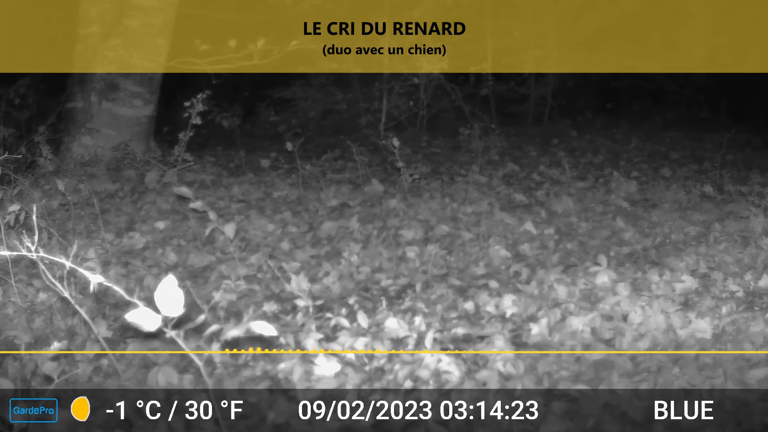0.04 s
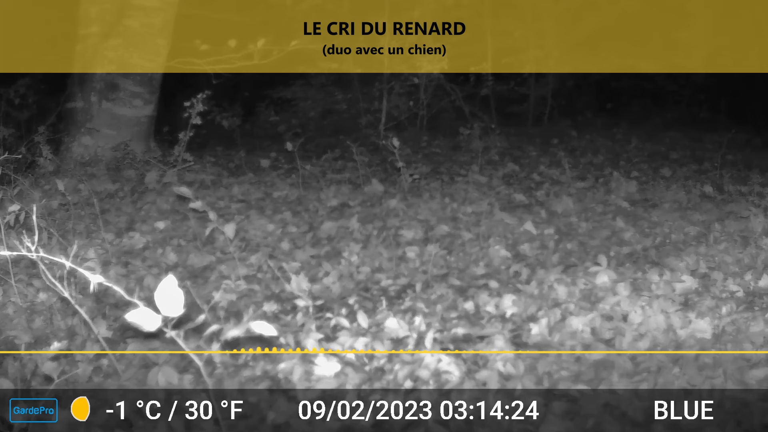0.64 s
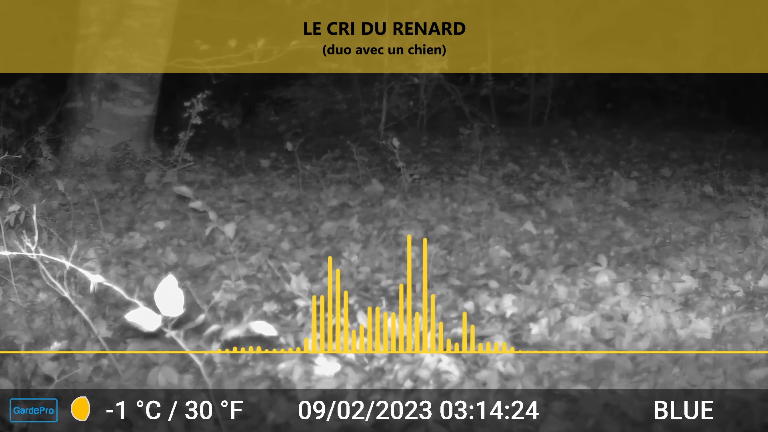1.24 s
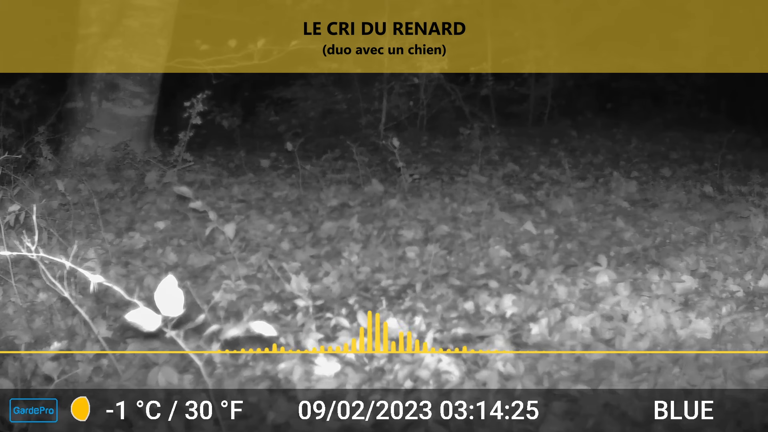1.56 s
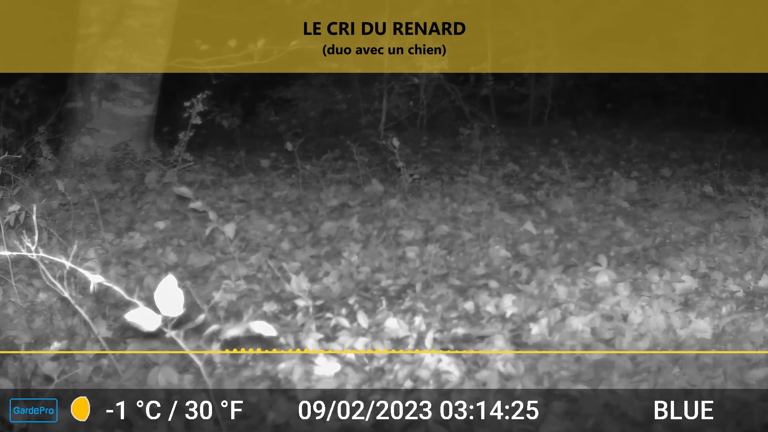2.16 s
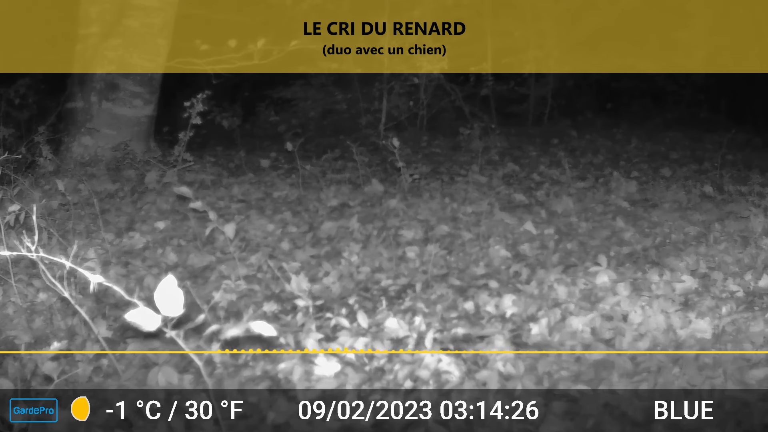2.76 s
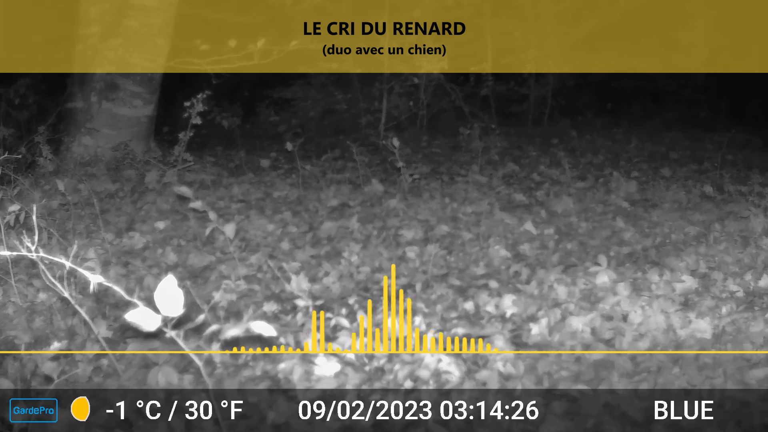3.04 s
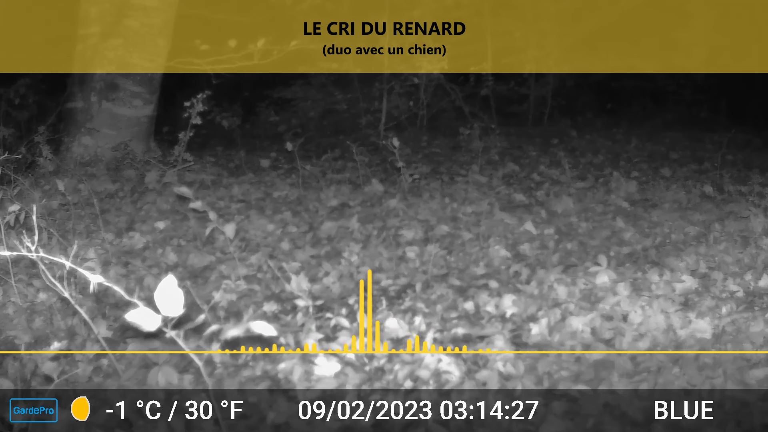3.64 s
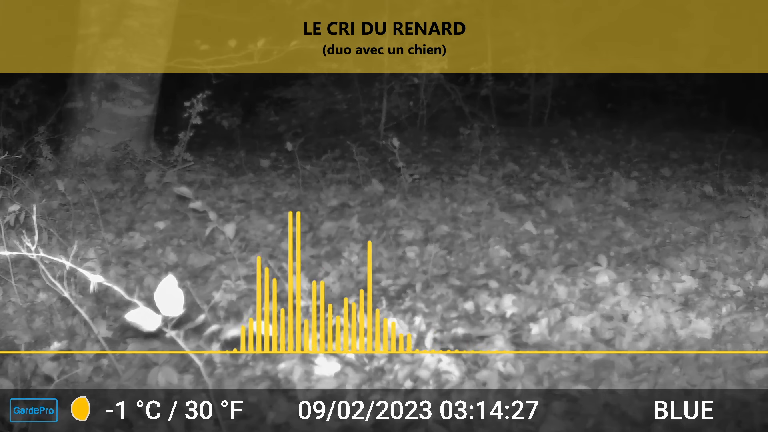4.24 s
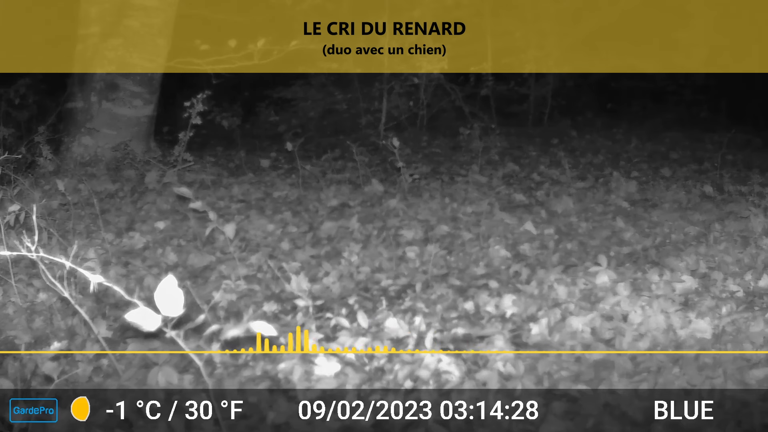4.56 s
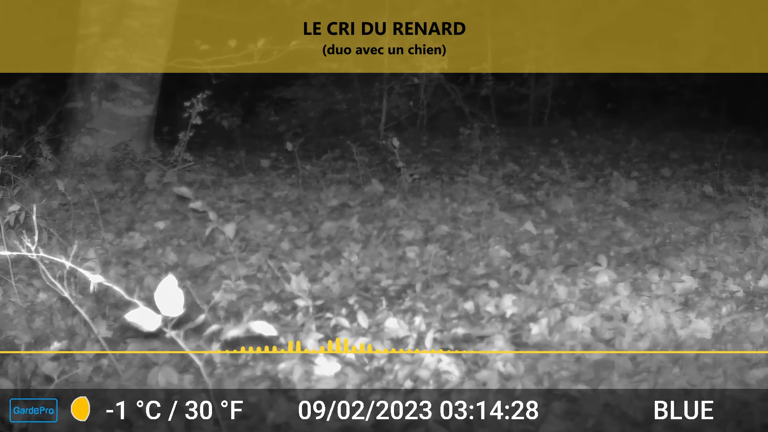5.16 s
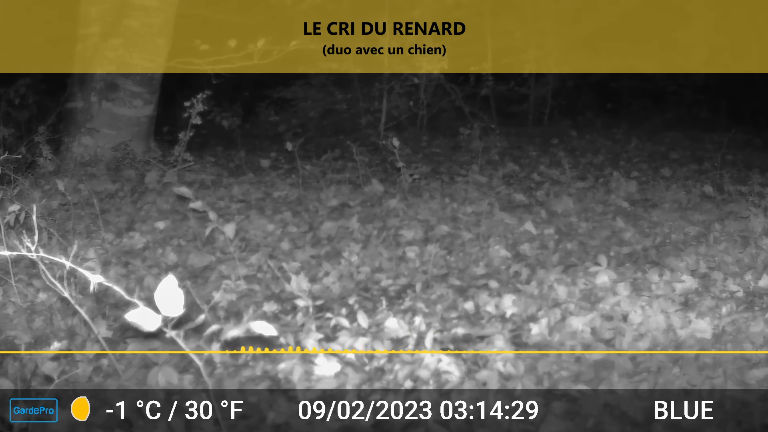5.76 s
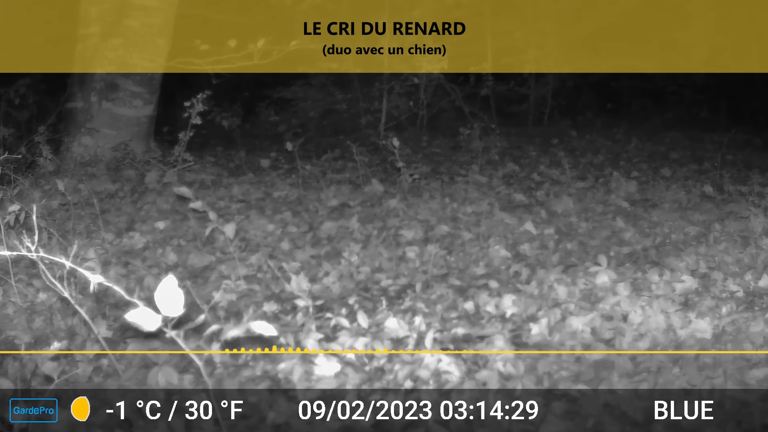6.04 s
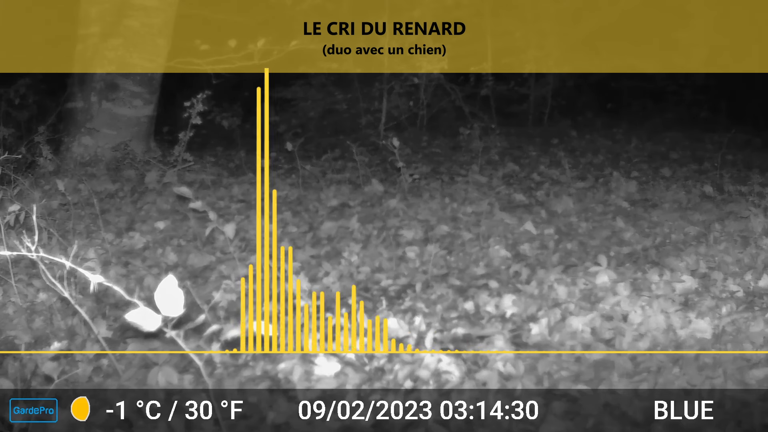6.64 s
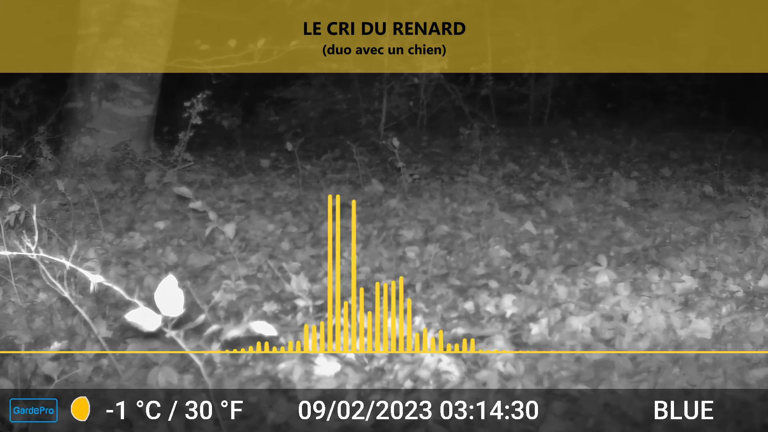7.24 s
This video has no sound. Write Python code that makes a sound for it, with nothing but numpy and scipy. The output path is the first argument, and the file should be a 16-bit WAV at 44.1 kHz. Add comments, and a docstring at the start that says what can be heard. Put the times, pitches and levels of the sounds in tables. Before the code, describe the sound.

A fox screams four times in a quiet wood at night while a dog barks twice further off, over faint steady hiss.

```python
"""A still wood at night, heard through the one microphone of a small trail camera.
A fox screams four times: its vocal folds start in a thin whistle, break into period doubling,
tripling and rasp, and mostly fall back to the whistle. Further off a dog barks twice, rough pulses
ringing its chest and mouth. Trunks scatter the calls into a long tail; underneath lie the
microphone's hiss and a low, bumping rumble."""
import sys
import numpy as np
from scipy import signal
from scipy.fft import rfft, irfft, next_fast_len
from scipy.io import wavfile
from scipy.ndimage import uniform_filter1d, map_coordinates

SR = 44100
rng = np.random.default_rng(int(sys.argv[2]) if len(sys.argv) > 2 else 0)


def pcm_store(signal):
    """Save signal as 16-bit PCM."""
    levels = np.round(np.clip(np.atleast_2d(signal), -1, 1) * 32767)
    wavfile.write(sys.argv[1], SR, levels.astype(np.int16).T)


N = 330309
T = np.arange(N) / SR
SLIP_S = 0.058  # time the folds take to slip into a way of vibrating


def fox():
    """Four screams and a few yelps, answered by near trunks and the depth of the wood."""
    # One arch per call. Each row: time in seconds, fold pitch in Hz, effort in dB, rasp in dB,
    # upper edge set by the mouth's opening in Hz.
    arches = [
        [(.88, 794.3, -63.5, -25, 1500), (.92, 779.7, -52, -30.5, 1510), (.957, 791, -61, -24.5, 1510),
         (.975, 807, -43, -27.5, 1510), (1.002, 824.6, -37, -29, 1810), (1.012, 820.8, -43, -15, 2050),
         (1.058, 824.6, -38.5, -18.5, 2040), (1.076, 880.3, -33, -11, 2200), (1.11, 906.5, -32.5, -7, 2420),
         (1.145, 924.5, -31, -6, 2670), (1.175, 941.2, -28, -9, 2760), (1.235, 954, -28.5, -7, 2740),
         (1.29, 948, -29, -2.5, 2840), (1.38, 957, -28, -1.5, 3000), (1.54, 893.2, -29.5, -3.5, 2670),
         (1.578, 869.6, -28.5, -6, 2330), (1.592, 856, -41.5, -15, 2400), (1.70, 789, -39, -14, 1900)],
        [(2.995, 792, -61, -28.5, 1490), (3.012, 825.7, -39.5, -23.5, 1515), (3.04, 809, -48, -25.5, 1790),
         (3.06, 813.2, -41, -24, 1906), (3.095, 854.2, -35, -20, 2250), (3.13, 935.3, -33, -3, 2520),
         (3.185, 886.8, -29.5, -7, 2730), (3.27, 907, -28, -6, 2780), (3.31, 902.6, -28.5, -1.5, 2750),
         (3.36, 887.5, -28, -6.5, 2670), (3.43, 865, -28.5, -6.5, 2540), (3.48, 882.4, -30, -8, 2660),
         (3.53, 901, -28, -10.5, 2600), (3.61, 883.3, -32, -14.5, 2540), (3.68, 844.5, -37, -16.5, 2350),
         (3.76, 801, -36, -16.5, 2110), (3.84, 734, -46, -9.5, 1580)],
        [(4.7, 771, -50, -40, 1490), (4.76, 788, -35.5, -34, 1470), (4.83, 806, -34.5, -29, 1810),
         (4.89, 819.3, -34, -32.5, 1946), (4.96, 826.5, -35, -29, 2210), (5.06, 795, -38, -22, 2096),
         (5.15, 773.5, -40.5, -12, 1830), (5.185, 745, -59.5, -24, 1600), (5.26, 670, -51, -15.5, 1500)],
        [(7.17, 798, -42, -24, 1300), (7.203, 882, -35, 4, 2210), (7.245, 909, -28.5, 0.5, 2400),
         (7.258, 1014, -25.5, -5, 2400), (7.32, 1050, -28, 0.5, 2450), (7.38, 1056, -29, 6, 2500),
         (7.49, 1013, -32, 2, 2450)],
    ]
    # One row per call: voice breaks and whistle returns in seconds, plain tone in dB,
    # its fade in dB per second, offset of its overtones in dB, hoarse air in dB.
    courses = [(1.078, 1.49, -5, 31.5, 5.5, -37), (3.101, 3.42, -10, 29.5, 4.5, -31),
               (4.85, 4.846, -33, 9, 2, -50), (7.188, 8.4, 7, 70, -5, -42)]
    # The throat's resonances in each call. Each row: frequency in Hz, gain in dB.
    first_throat = [(500, -46.5), (770, -17), (890, -2.5), (1130, 8), (1420, 1), (1870, 8), (2120, -2.5),
                    (2380, 0.5), (2800, -10), (3300, -16), (3750, -9), (4270, -4), (4700, -14), (5500, -46)]
    second_throat = [(500, -46), (760, -9.5), (890, -4), (1150, -2), (1420, 6), (1800, 6), (2080, 3.5),
                     (2380, 0.5), (2750, -7.5), (3250, -2.5), (3650, -3), (4300, -11.5), (5500, -34)]
    whine_throat = [(600, -56), (1100, -23), (1650, -7), (1920, -5), (2200, -8), (2430, -17), (3200, -28)]
    low_throat = [(400, -58.5), (700, -29), (850, -3), (1050, 4.5), (1300, 1.5), (1700, 4), (2050, -5),
                  (2400, -12), (2750, -9), (3600, -3.5), (4300, -7), (5500, -48.5)]
    # Yelps as calls run out. Each row: centre and half length in seconds, pitch in Hz, level in dB.
    yelps = [(1.618, 0.0028, 1466, -23), (1.705, 0.0093, 1112, -35), (3.866, 0.0089, 1071, -41),
             (5.297, 0.017, 1011, -39.5)]
    throats = [first_throat, second_throat, whine_throat, low_throat]
    direct = sum(scream(*call) for call in zip(arches, courses, throats))
    direct += sum(yelp(*row) for row in yelps)
    near = amp(-11) * scatter(direct, t60=.14, build_s=.004)
    deep = amp(-12.5) * scatter(direct, t60=1.3, build_s=.023)
    return amp(-2.5) * direct + near + deep


def scream(arch, course, throat, whistle_fade_s=.24):
    """The folds whistle, then break into harsher ways of vibrating, coloured by throat and mouth."""
    # Spells when the folds repeat only every second or every third cycle.
    # Each row: start and length in seconds, level in dB.
    doublings = [(1.155, 0.12, 0), (1.26, 0.15, -2.5), (1.495, 0.067, -4), (3.165, 0.125, -1)]
    triplings = [(1.02, 0.1, -6.5), (1.33, 0.21, -6), (3.095, 0.035, -5.5), (3.325, 0.3, -1),
                 (3.62, 0.1, -7.5), (4.855, 0.075, -7.5), (4.935, 0.15, -7), (7.36, 0.18, 1.5)]
    # The mouth's main resonance and its upper edge. Each row: Hz at a mouth_scale of 1, gain in dB.
    mouth_resonance = [(1150, 0.5), (1380, 2), (1540, 4), (1660, 3), (1800, 2.5), (1950, -0.5), (2300, 0.5)]
    mouth_edge = [(1900, 1), (2450, 2), (2600, -5.5), (2780, -15.5), (3050, -25)]
    # Air forced past the folds, a hoarse band above the voice. Each row: frequency in Hz, gain in dB.
    air_band = [(2000, -21), (2900, 0), (3300, -1.5), (3800, -7.5), (4350, -8), (4800, -19.5),
                (6000, -43.5)]
    breaks, returns, tone_db, fade_db_per_s, overtone_db, air_db = course
    inside, t, gate = span(arch[0][0], arch[-1][0])
    hz, effort_db, rasp_db, edge_hz = curves(arch, t)
    slack_db = effort_db - effort_db.max()
    rasp_gain = amp(rasp_db)
    mouth_scale = edge_hz / 2500
    # the whistle sinks while the voice is broken
    broken = np.clip(np.minimum(t - breaks + SLIP_S, returns + SLIP_S - t) / whistle_fade_s, 0, 1)
    whistle_db = -2.5 - 21 * broken + 1.5 * walk(t, 40)
    unrest = .003 + .011 * rasp_gain  # the harsher the voice, the less steady its cycles
    phase = 2 * np.pi * np.cumsum(hz * (1 + .005 * walk(t, 44.93) + unrest * walk(t, 500))) / SR
    # the plain tone comes in towards the break, nearly a sine until the folds are driven hard
    onset_db = -13.5 * np.clip((breaks - t) / .091, 0, 1) ** 2
    plain_db = tone_db + onset_db - fade_db_per_s * np.maximum(t - breaks, 0)
    drive = amp(-9.5 + overtone_db + 3.9 * slack_db)
    plain = stack(t, phase, [1], wander_rad=.6 * rasp_gain) + drive * stack(t, phase, [2, 3])
    halves, thirds = subharmonics(t, phase, rasp_gain, slack_db)
    # the whistle keeps five cycles to every three of the folds, and frays as the rasp grows
    whistle = np.cos(phase * 5 / 3 + 1.2 * np.sqrt(rasp_gain) * walk(t, 150))
    chaos = rasp(t, phase / 2, flutter_db=-.5, flutter_rate=90)
    chaos = sliding_colour(chaos, mouth_resonance, mouth_scale)
    ways = [(plain, amp(plain_db)), (halves, spells(doublings, t)),
            (thirds, spells(triplings, t)), (chaos, rasp_gain)]
    body = sum(gain * unit(colour(way, throat)) for way, gain in ways)
    body = sliding_colour(body, mouth_edge, mouth_scale)
    voice = steady(amp(whistle_db) * unit(whistle) + body)
    air = amp(air_db) * unit(colour(rasp(t, phase, flutter_db=3, flutter_rate=77), air_band))
    air_rise = np.clip((t - breaks) / .33, 0, 1)
    stutter_db = 2.2 * np.clip((t - returns) / whistle_fade_s, 0, 1) * walk(t, 70)
    shimmer_db = .86 * walk(t, 35)
    out = np.zeros(N)
    out[inside] = (voice + air_rise * air) * gate * amp(effort_db + stutter_db + shimmer_db)
    return out


def subharmonics(t, phase, rasp_gain, slack_db):
    """Folds repeating every second or third cycle give partials on a half or a third of the pitch."""
    def partials(period, multiples):
        return stack(t, phase / period, multiples, flicker_db=3.5 * rasp_gain ** .2,
                     flicker_rate=30, wander_rad=rasp_gain)

    halves = amp(-3.5) * partials(2, [3]) + partials(2, range(4, 12))
    thirds = amp(2 + .18 * slack_db) * partials(3, [3, 4]) + partials(3, range(6, 17))
    return halves, thirds


def spells(rows, t):
    """Gain of a way of vibrating that ramps in and out."""
    return sum(amp(db) * np.clip(.5 + np.minimum(t - start, start + length - t) / SLIP_S, 0, 1)
               for start, length, db in rows)


def rasp(t, phase, flutter_db, flutter_rate):
    """Chaotic vibration: a burst of noise each cycle, in uneven flurries."""
    return rng.standard_normal(len(t)) * (1 + np.cos(phase)) * amp(flutter_db * walk(t, flutter_rate))


def yelp(centre, half, hz, db, fall_octaves_per_s=3.7, waver=.028):
    """A last squeeze of the whistle, sliding down."""
    inside, t, gate = span(centre - 3 * half, centre + 3 * half)
    pitch = hz * 2 ** (-fall_octaves_per_s * (t - centre)) * (1 + waver * walk(t, 300))
    tone = unit(np.sin(2 * np.pi * np.cumsum(pitch) / SR))
    out = np.zeros(N)
    out[inside] = amp(db) * gate * np.exp(-.5 * ((t - centre) / half) ** 2) * tone
    return out


def dog():
    """Two barks further off, with hollow echoes that come and go in a long far tail."""
    # Each row: start and length in seconds, chest level and open-mouth level in dB.
    barks = [(4.253, 0.2696, -28.5, -32), (6.657, 0.34, -29, -33.5)]
    # The hollow colour of the far tail and echoes. Each row: frequency in Hz, gain in dB.
    far_colour = [(300, -32), (430, -18.5), (510, -10), (620, -14.5), (740, -2), (810, -1.5), (950, -13),
                  (1400, -14), (2200, -24)]
    # Echoes off the far edges of the wood. Each row: delay in seconds, gain in dB.
    far_echoes = [(.32, -13), (.68, -17), (1.27, -26), (1.9, -35)]
    direct = sum(bark(*row) for row in barks)
    deep = amp(-18.5) * scatter(direct, t60=1.2, build_s=.03)
    hollow = colour(direct, far_colour)
    tail = amp(-17) * scatter(hollow, t60=3, build_s=.1)
    thrown = scatter(hollow, t60=.12, build_s=.005)
    echoes = sum(amp(db) * np.interp(T - delay, T, thrown, left=0) for delay, db in far_echoes)
    flutter = amp(3.2 * walk(T, 13))
    return direct + deep + (tail + echoes) * flutter


def bark(start, length, low_db, open_db, jitter=.1137, release_s=.1):
    """Rough low pulses ring the chest first; the upper resonances follow as the mouth opens."""
    # Pitch through a bark. Each row: share of its length from 0 to 1, pitch in Hz.
    pitch_curve = [(0, 235.9), (.15, 244.9), (.35, 252.2), (.5, 242), (1, 253.3)]
    # Resonances of chest and mouth. Each row: frequency in Hz, gain in dB.
    chest_colour = [(230, -49), (345, -23), (420, -9.5), (480, -1), (545, -3), (620, -16), (1200, -95.5)]
    mouth_colour = [(300, -45), (680, 1), (780, 11), (880, -2.5), (980, -0.5), (1110, -3.5), (1280, 3.5),
                    (1480, 3.5), (1720, -12.5), (1950, -29), (2400, -34), (3500, -89.5)]
    inside, t, gate = span(start, start + length + release_s)
    age = t - start
    release_db = -17.5 * np.maximum(age - length, 0) / release_s
    catch_db = -11 * np.exp(-((t - 4.36) / .018) ** 2)  # the chest tone catches in the first bark
    chest_db = low_db + swell(age, attack_s=.032, hold_s=.048, fade_db_per_s=56.5) + release_db + catch_db
    mouth_db = open_db + swell(age, attack_s=.04, hold_s=.12, fade_db_per_s=54.5) + release_db
    hz, = curves(pitch_curve, age / length)
    rough = amp(-7.5 * np.clip(1 - age / .075, 0, 1))  # starts cleaner and soon roughens
    phase = 2 * np.pi * np.cumsum(hz * (1 + rough * jitter * walk(t, 160))) / SR
    pulses = unit(stack(t, phase, range(2, 12), flicker_db=5.5))
    chaos = unit(rasp(t, phase, flutter_db=-1.5, flutter_rate=80))
    chest = steady(colour(pulses + rough * amp(-4) * chaos, chest_colour), size=700)
    mouth = colour(pulses + amp(6) * chaos, mouth_colour)
    mouth = steady(jaws(mouth, mouth_db), size=700)
    out = np.zeros(N)
    out[inside] = gate * (amp(chest_db) * chest + amp(mouth_db) * mouth)
    return out


def swell(age, attack_s, hold_s, fade_db_per_s):
    """Level in dB of a sound that rises from a soft start, holds and fades."""
    rise = np.clip(age / attack_s, .02, 1) ** 2
    return 20 * np.log10(rise) - fade_db_per_s * np.maximum(age - attack_s - hold_s, 0)


def jaws(x, level_db, corner_hz=1520, treble_db_per_db=.94):
    """The jaws part with effort, so the loudest moments are the brightest."""
    dull = signal.sosfiltfilt(signal.butter(3, corner_hz, fs=SR, output="sos"), x)
    return dull + (x - dull) * amp(treble_db_per_db * (level_db - level_db.max()))


def scatter(x, t60, build_s):
    """Echoes off trunks, of very uneven size, that build up and die away."""
    t = T[:2 * SR]
    trunks = rng.standard_normal(len(t)) * (rng.random(len(t)) < .05)
    response = trunks * np.exp(-np.log(1000) * t / t60) * (1 - np.exp(-t / build_s))
    return signal.fftconvolve(x, response / np.sqrt(np.sum(response ** 2)))[:N]


def bumps():
    """Soft, dull thuds of a few cycles each."""
    # Each row: centre in seconds, peak level in dB, pitch in Hz.
    thuds = [(0.559, -54.5, 100), (1.28, -49.5, 87.3), (1.52, -45, 126.2), (2.931, -57, 135),
             (3.34, -46, 81.7), (4.63, -52.5, 89.44), (5.497, -49.5, 69.6), (6.381, -52.5, 129.4),
             (6.502, -51, 64.7), (7.247, -48, 130)]
    phase_per_hz = 2 * np.pi * np.cumsum(1 + .3 * walk(T, 200)) / SR
    return sum(amp(db) * np.exp(-np.abs(T - centre) / .022) * np.sin(hz * phase_per_hz)
               for centre, db, hz in thuds)


def hiss():
    """Even microphone hiss over a restless low rumble."""
    # Microphone noise and the hush of the wood. Each row: frequency in Hz, gain in dB.
    floor_colour = [(20, -2.5), (120, 0), (200, -3.5), (500, -7), (800, -8), (1300, -13), (2000, -14.5),
                    (3500, -18), (6000, -20.5), (7500, -21.5)]
    noise = unit(colour(rng.standard_normal(N), floor_colour))
    low = signal.sosfiltfilt(signal.butter(2, 220, fs=SR, output="sos"), noise)
    restless = amp(2.3 * walk(T, 11))
    return amp(-61) * (noise - low + low * restless)


def amp(db):
    """Decibels to gain."""
    return 10 ** (np.asarray(db) / 20)


def unit(x):
    """Scale to rms 1."""
    return x / np.sqrt(np.mean(x ** 2))


def steady(x, size=1100):
    """Hold the rms over `size` samples at 1, so that effort alone sets the loudness."""
    return x / np.sqrt(np.abs(uniform_filter1d(x ** 2, size)) + 1e-12)


def curves(rows, t):
    """The columns of a table, joined by straight lines at times t."""
    times, *columns = np.transpose(rows)
    return [np.interp(t, times, column) for column in columns]


def walk(t, rate):
    """A smooth random curve of rms 1 that changes `rate` times a second."""
    steps = rng.standard_normal(8192)
    return unit(map_coordinates(steps, [(t - t[0]) * rate], order=3, mode="wrap"))


def span(start, end, fade=.015):
    """The samples that a call covers, their times, and a gate with soft edges."""
    inside = (T >= start) & (T <= end + fade)
    t = T[inside]
    return inside, t, np.clip(np.minimum(t - t[0], end + fade - t) / fade, 0, 1)


def stack(t, phase, multiples, flicker_db=2, flicker_rate=22, wander_rad=0):
    """Partials on multiples of a phase, each swelling, fading and bending on its own."""
    return sum(np.cos(k * phase + 2 * np.pi * rng.random() + wander_rad * walk(t, 59.96))
               * amp(flicker_db * walk(t, flicker_rate)) for k in multiples)


def colour(x, points):
    """Filter by a spectrum of (Hz, dB) points."""
    size = next_fast_len(len(x) + 4096)
    hz, db = np.transpose(points)
    bin_hz = np.maximum(np.arange(size // 2 + 1) * SR / size, 1)
    gain = amp(np.interp(np.log(bin_hz), np.log(hz), db))
    return irfft(rfft(x, size) * gain, size)[:len(x)]


def sliding_colour(x, points, scale):
    """Filter by a spectrum whose frequencies follow a moving scale: stretch, filter, stretch back."""
    clock = np.cumsum(scale)
    positions = np.interp(np.arange(clock[-1]), clock, np.arange(len(x)))
    stretched = map_coordinates(x, [positions], mode="nearest")
    return map_coordinates(colour(stretched, points), [clock], mode="nearest")


def scene():
    """Fox, dog and the night's noise floor in one channel."""
    return (fox() + dog() + bumps() + hiss())[None]


def record(dry, top_hz=7450):
    """The trail camera cuts off the upper treble."""
    return signal.sosfilt(signal.ellip(10, .2, 70, top_hz, fs=SR, output="sos"), dry)


dry = scene()
out = record(dry)
pcm_store(out)
```